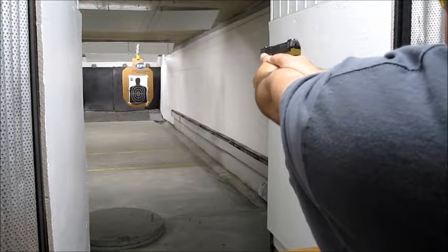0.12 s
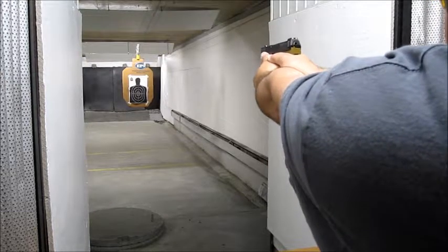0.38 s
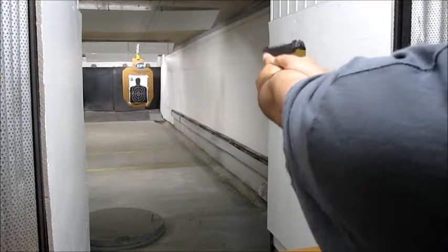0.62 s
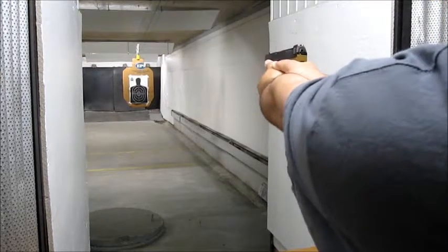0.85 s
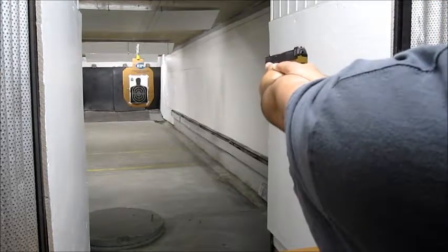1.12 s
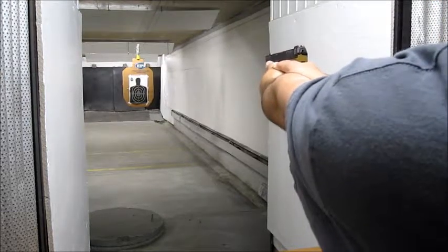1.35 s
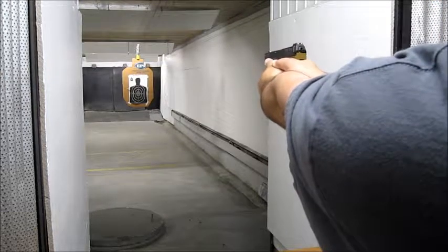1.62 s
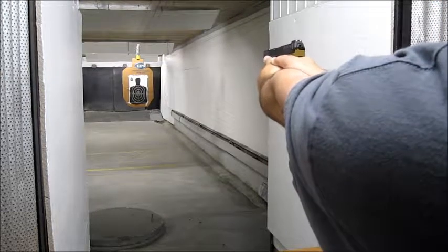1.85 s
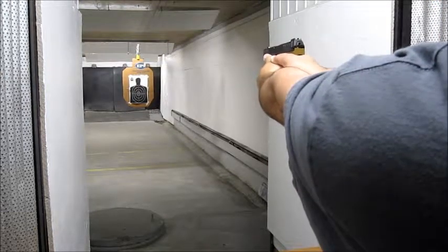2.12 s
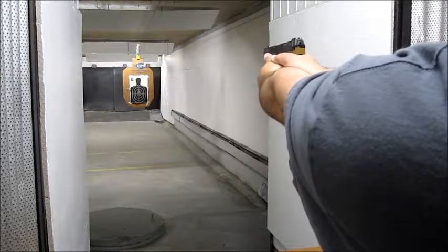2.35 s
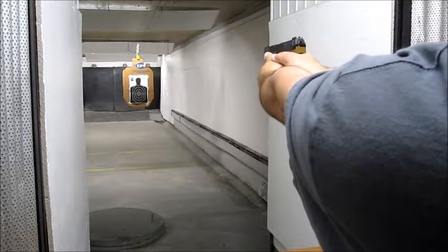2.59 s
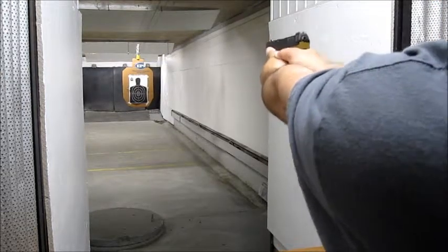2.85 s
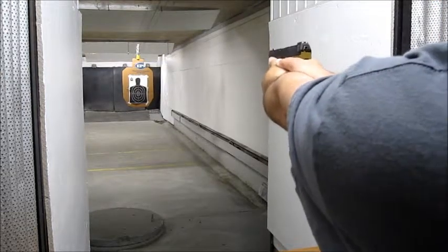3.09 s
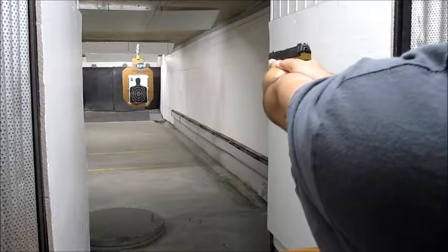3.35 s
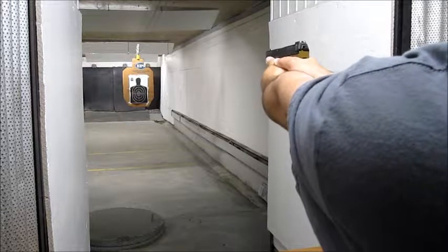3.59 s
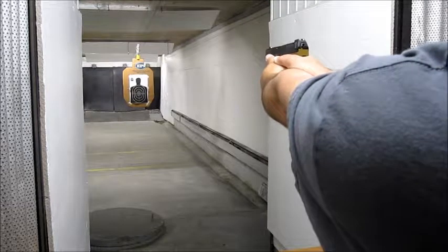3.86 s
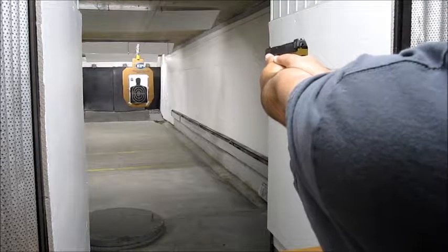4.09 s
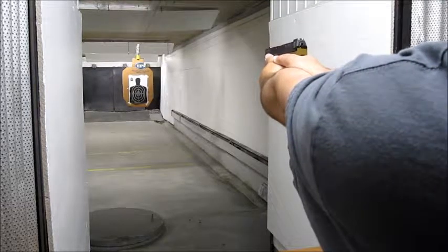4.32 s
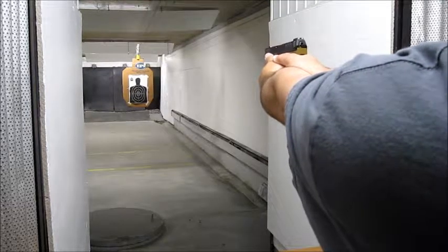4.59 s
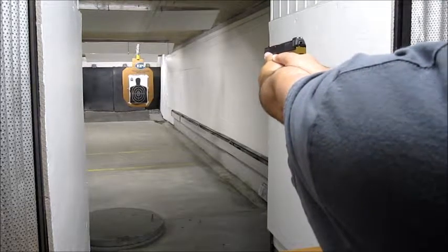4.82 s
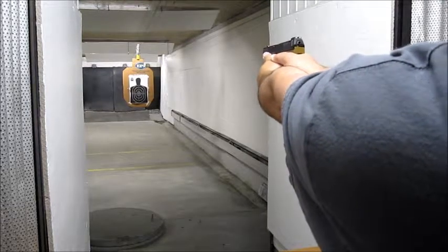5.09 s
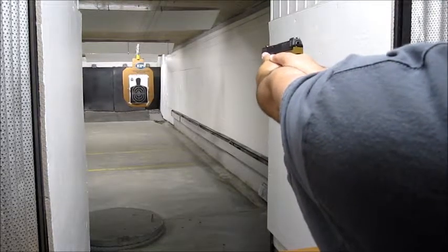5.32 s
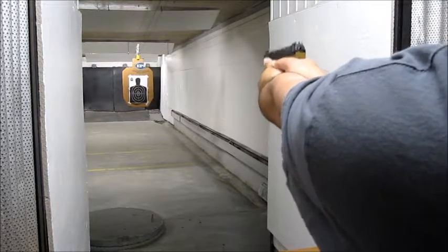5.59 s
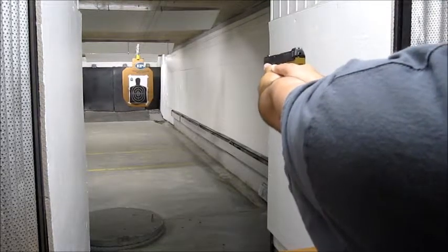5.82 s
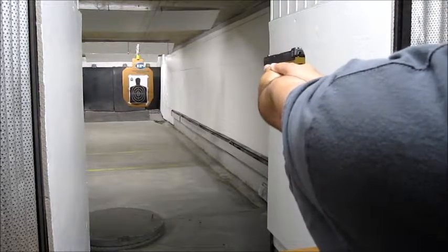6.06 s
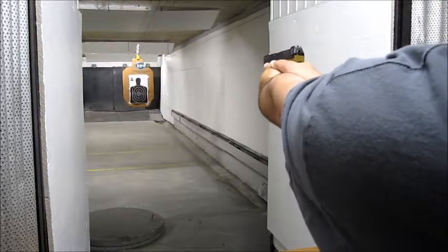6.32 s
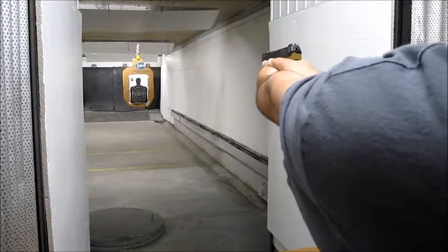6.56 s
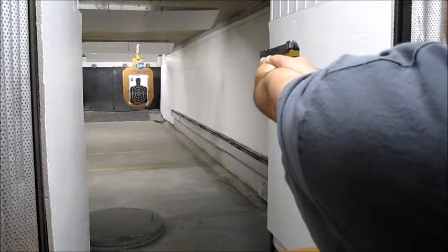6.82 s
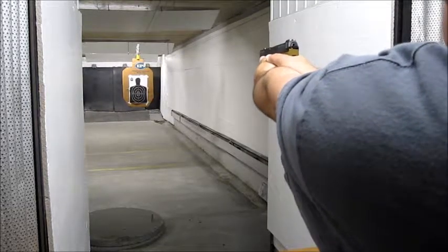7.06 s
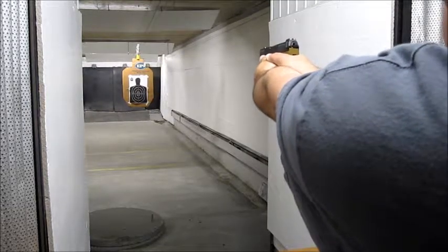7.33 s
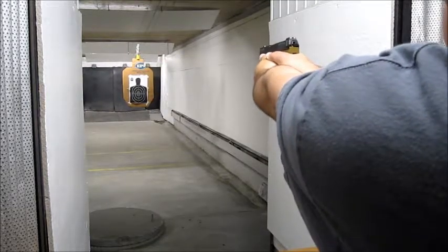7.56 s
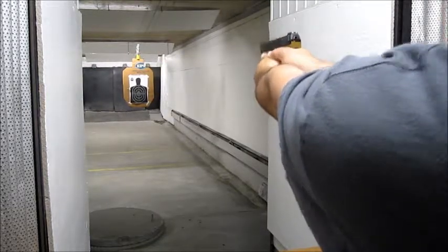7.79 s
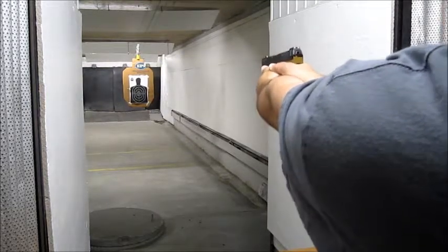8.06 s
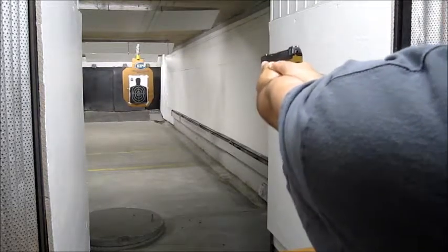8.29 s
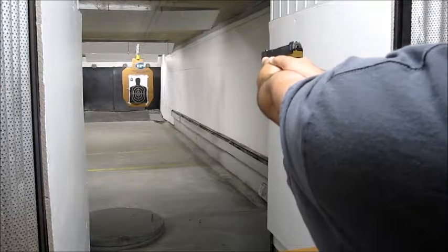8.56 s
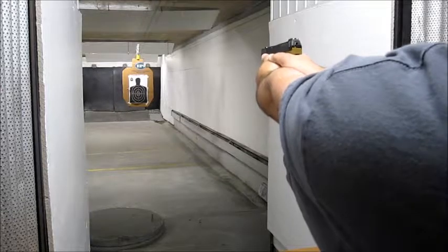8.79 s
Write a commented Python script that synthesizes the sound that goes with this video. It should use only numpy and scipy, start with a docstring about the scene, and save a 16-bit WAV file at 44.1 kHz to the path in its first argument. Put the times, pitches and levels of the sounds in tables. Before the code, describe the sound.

Four slow pistol shots overload and echo down a concrete indoor range, brass cases clinking and ringing afterward over steady ventilation hiss.

```python
"""A concrete firing lane: four slow pistol shots, heard by a small camera beside the shooter.
Each blast is banded noise that overloads the input, slaps back from the far wall and dies in the hall
while gain control holds it level. Steel fittings ring on as decaying partials. The spent brass case
ticks in noise bursts, sings as a beating tone and rattles something hollow.
Soft swishes of treble come and go; ventilation, shaped noise with faint fan tones, hisses throughout."""
import sys
import numpy as np
from scipy import signal
from scipy.fft import rfft, irfft, next_fast_len
from scipy.io import wavfile

SR = 44100
rng = np.random.default_rng(int(sys.argv[2]) if len(sys.argv) > 2 else 0)


def decibels_to_gain(level_db):
    """Convert a level in decibels to a linear amplitude gain (20 dB per decade)."""
    exponent = np.asarray(level_db, float) / 20
    return 10 ** exponent


def int16_out(signal):
    """Quantize to a 16-bit WAV file."""
    q = np.round(np.clip(np.atleast_2d(signal).T, -1, 1) * 32767)
    wavfile.write(sys.argv[1], SR, q.astype(np.int16))


N = 393372
TIME = np.arange(N) / SR  # s

# spectrum of the ventilation rush, shape only: (frequency [Hz], relative density [dB per Hz])
AIR_SPECTRUM = [(15, -32.5), (25, -9), (114, -7), (206, -11.5), (242, -5), (405, -8.5), (463, -9.5),
                (641, -10), (936, -8), (1040, -9.5), (1610, -14), (2280, -17), (16000, -44)]
# fan tones ahead of gain control: (frequency [Hz], rms level [dB])
FAN_TONES = [(242.2, -69.5), (452.2, -62.5)]
# shots: (time [s], blast level ahead of gain control [dB])
SHOTS = [(0.4953, 41), (2.8222, 40.5), (5.466, 41), (7.8021, 40.5)]
# a faint click of the pistol's action, then a short noise right before the blast:
# (lead [s], level [dB], centre [Hz], t60 [s])
LEAD_IN = [(0.021, -41, 6000, 0.07), (0.0035, -26, 3500, .03)]
# hall after a shot, band by band: (frequency [Hz], relative density [dB per Hz], t60 [s], build-up [s])
HALL_BANDS = [(40, -44, 1.1, .004), (125, -30.5, 0.76, .006), (205, -19, 0.81, .012),
              (420, -4.5, 0.91, 0.03), (616, -5, 0.97, 0.025), (932, 1.5, 0.98, 0.033),
              (1250, -1, 1.033, 0.023), (1655, -2, 1, 0.039), (3570, -10, 0.94, 0.0094),
              (5710, -15, 0.87, 0.0073), (7530, -15.5, 0.68, 0.0089), (11000, -21, 0.54, 0.0049),
              (14000, -25.5, .48, 0.0055), (17000, -38, .45, 0.0055)]
# partials of the steel fittings: (frequency [Hz], relative level [dB], t60 [s])
STEEL_MODES = [(432, 1.5, 1.67), (455, -18.5, 4.26), (699, 4, 1.76), (695, -5.5, 1.3), (860, -3.5, 1.8),
               (913, -1, 2.02), (1001, 2.5, 1.5), (1052, 0.5, 2.04), (1526, -0.5, 1.8)]
# the case strikes something hollow:
# (time [s], level [dB], strongest near [Hz], share of the free ringing time [ratio])
KNOCKS = [(1.3186, -21.5, 3200, 0.17), (1.8990, -32, 2580, 1), (6.2457, -19, 3050, .14),
          (6.6267, -25.5, 1240, 0.37), (6.682, -34.5, 1250, 0.18), (6.704, -34.5, 1190, 0.19)]
# partials of the hollow thing, ringing freely: (frequency [Hz], relative level [dB], t60 [s])
HOLLOW_MODES = [(1070, 2.5, 0.15), (1301, 6, 0.19), (1576, -1, 0.32), (1900, -26, 0.12), (2135, -21, .1),
                (2293, 0, 0.33), (2400, -2, 0.12), (2540, 9, 0.18), (2920, 13, 0.12), (3100, -12, 0.18),
                (3470, 4.5, 0.19), (3680, 5, 0.13), (4040, 1, 0.17), (4156, -9, 0.14), (4630, -7, 0.173)]
# case bounces that stand out: (time [s], tick level [dB], tick centre [Hz], wall ring level [dB])
BOUNCES = [(1.3196, -20.5, 6200, -58), (1.4121, -7.5, 6400, -32), (1.7469, -29.5, 4630, -41),
           (1.8990, -40, 7000, -39), (1.9654, -40.5, 7500, -41), (1.9960, -35, 7500, -26.5),
           (2.0304, -57, 6000, -35), (2.0990, -30.5, 7270, -28), (2.3484, -63, 6000, -60),
           (2.6744, -66, 6000, -67), (3.6422, -18, 5430, -34), (3.7888, -50, 8000, -69),
           (3.973, -31, 4660, -45.5), (4.104, -31.5, 4530, -36), (4.2460, -37, 6000, -32),
           (4.2994, -50, 4600, -55), (4.4974, -60.5, 6000, -52), (4.6694, -62, 6000, -49),
           (4.7444, -63.5, 6000, -52), (6.2468, -18, 6400, -58), (6.4495, -12, 3070, -34),
           (6.6292, -23, 6200, -52), (6.683, -30, 3000, -65), (6.7320, -31, 2980, -64),
           (6.8496, -40, 3300, -73), (6.915, -40, 3270, -71), (7.0500, -44, 3000, -66),
           (7.2091, -46.5, 3300, -70), (8.5947, -20, 5540, -24.5)]
# wall ring of the case from each shot in turn: (frequency [Hz], t60 [s])
CASES = [(10630, 0.27), (10790, 0.35), (11310, 0.41), (11390, 0.41)]
# soft swishes: (centre time [s], level [dB], width [s], centre frequency [Hz])
SWISHES = [(2.55, -61, 0.053, 6000), (4.48, -60, 0.027, 7000), (4.596, -51, 0.0348, 5700),
           (5.23, -60, 0.0083, 8500)]


def fade(t, t60):
    """Amplitude of an exponential decay that starts at t = 0 and loses 60 dB in t60 seconds."""
    return np.where(t >= 0, np.exp(-np.log(1000) * np.maximum(t, 0) / t60), 0)


def band(x, hz, octaves):
    """Band-pass around hz."""
    edges = np.clip(hz * 2. ** (np.array([-.5, .5]) * octaves), 10, .45 * SR)
    return signal.sosfilt(signal.butter(2, edges, "band", fs=SR, output="sos"), x)


def unit(x):
    """Scale to rms 1."""
    return x / np.sqrt(np.mean(x ** 2))


def noise_band(length, hz, octaves):
    """White noise band-passed around hz, at rms 1."""
    return unit(band(rng.standard_normal(length), hz, octaves))


def ring(t, modes):
    """Sum of decaying partials (frequency [Hz], level [dB], t60 [s]) with chance phases."""
    out = np.zeros(len(t))
    for hz, db, t60 in modes:
        phase = rng.uniform(0, 2 * np.pi)
        out += decibels_to_gain(db) * fade(t, t60) * np.sin(2 * np.pi * hz * t + phase)
    return out


def add(out, s, x):
    """Mix x into out from time s."""
    i = int(s * SR)
    out[i:i + len(x)] += x[:len(out) - i]


def ventilation():
    """Air rushes smoothly and broadly: noise shaped in frequency, with faint steady fan tones."""
    rush_db = -46.5  # rms
    hz, db = np.transpose(AIR_SPECTRUM)
    size = next_fast_len(N)
    f = np.maximum(np.fft.rfftfreq(size, 1 / SR), 1)
    shape = decibels_to_gain(np.interp(np.log(f), np.log(hz), db))
    rush = irfft(rfft(rng.standard_normal(size)) * shape, size)[:N]
    out = decibels_to_gain(rush_db) * unit(rush)
    for tone_hz, tone_db in FAN_TONES:
        out += np.sqrt(2) * decibels_to_gain(tone_db) * np.sin(2 * np.pi * tone_hz * TIME)
    return out


def lead_in(out, shot_s):
    """A faint click of the pistol's action, then a short noise close to the blast: decaying noise bands."""
    t = TIME[:3000]
    for lead, db, hz, t60 in LEAD_IN:
        add(out, shot_s - lead, decibels_to_gain(db) * fade(t, t60) * noise_band(len(t), hz, 2.0))


def blast(t, count):
    """Dense reflections as banded noise: near walls, then slaps and tail from the far end."""
    near_db, near_t60 = 9.0, .36  # booth and near walls: dB over the tail, s
    trip, far_db, far_t60 = .0865, 5.0, .32  # far wall: round trip s, dB over the tail, s
    loss_db = -11.0  # change with each further trip
    power = (decibels_to_gain(near_db) * fade(t, near_t60)) ** 2
    power = power + (t >= trip)  # the tail joins after one round trip
    for k in range(3):
        slap = decibels_to_gain(far_db + k * loss_db) * fade(t - (k + 1) * trip, far_t60)
        power = power + slap ** 2

    hz, db, t60, build = np.transpose(HALL_BANDS)
    spectra = rfft(rng.standard_normal((count, len(t))))
    log_f = np.log(np.fft.rfftfreq(len(t), 1 / SR) + 1)
    place = np.interp(log_f, np.log(hz), np.arange(len(hz)))
    out = 0
    for k in range(len(hz)):
        share = np.clip(1 - np.abs(place - k), 0, 1)  # overlapping bands that add up to one
        noise = irfft(spectra * share, len(t))
        swell = 1 - np.exp(-t / build[k]) * 1.08  # 1.08 opens with a faint inverted onset
        out = out + decibels_to_gain(db[k]) * fade(t, t60[k]) * swell * noise
    return out * np.sqrt(power)


def steel():
    """Steel fittings swell and ring on: a sum of decaying partials."""
    level_db, swell = -11, .05  # dB, s
    t = TIME[:3 * SR]
    return decibels_to_gain(level_db) * ring(t, STEEL_MODES) * (1 - np.exp(-t / swell))


def shots():
    """One hall answers every shot, its reflections partly stirred by aim and moving air."""
    fresh = 0.58  # share of the blast's power that differs from shot to shot
    out = np.zeros(N)
    hall, *stirred = blast(TIME[:2 * SR], count=len(SHOTS) + 1)
    fittings = steel()
    for (s, db), other in zip(SHOTS, stirred):
        lead_in(out, s)
        add(out, s, decibels_to_gain(db) * (np.sqrt(1 - fresh) * hall + np.sqrt(fresh) * other))
        add(out, s, fittings)
    return out


def knocks():
    """The case rattles against something hollow: a rough clack, and taps that excite damped modes."""
    swell, t60 = .01, .24  # s, both scaled by each knock's share
    off_db = 11  # lost per octave from the strongest mode
    clack_db, clack_octaves = 7.5, 1.4  # dB over the knock, octaves
    out, t = np.zeros(N), TIME[:SR // 2]
    for s, db, hz, share in KNOCKS:
        shape = (1 - 0.58 * np.exp(-t / (swell * share))) * fade(t, t60 * share)
        taps = rng.standard_normal(len(t)) ** 3 * shape  # cubing leaves sparse peaks
        damped = []
        for mode_hz, mode_db, mode_t60 in HOLLOW_MODES:
            loss_db = off_db * abs(np.log2(mode_hz / hz))
            damped.append((mode_hz, db + mode_db - loss_db, mode_t60 * share))
        add(out, s, signal.fftconvolve(ring(t, damped), taps / np.linalg.norm(taps)))
        clack = unit(band(rng.laplace(size=len(t)), hz, clack_octaves))
        add(out, s, decibels_to_gain(db + clack_db) * shape * clack)
    return out


def bounce_noise(t, db, hz):
    """A bounce ticks in a noise band, wider and brighter when harder; a short body and booth tail follow."""
    tick_t60 = .035  # s
    breadth, wider = 2.2, .04  # octaves at -30 dB, octaves more per dB
    tail_db, tail_t60, tail_centre = -15.5, 0.44, 0.72  # booth: dB, s, share of tick centre
    edge_hz, edge_octaves, edge_tail_t60 = 9500, 1.2, .17  # bright edge: Hz, octaves, s
    edge_db, harder = -14, .15  # dB over a -20 dB tick, dB more per dB of tick
    body_octaves, body_t60, body_db = .26, .12, 1  # octaves, s, dB over the tick
    body_best_hz, body_off_db = 4750, 30  # strongest at Hz, dB lost per octave away

    octaves = max(breadth + wider * (db + 30), 1)
    tick = noise_band(len(t), hz, octaves) * fade(t, tick_t60)
    tail = decibels_to_gain(tail_db) * noise_band(len(t), tail_centre * hz, breadth) * fade(t, tail_t60)
    edge_shape = fade(t, tick_t60) + decibels_to_gain(tail_db) * fade(t, edge_tail_t60)
    edge_gain = decibels_to_gain(edge_db + harder * (db + 20))
    edge = edge_gain * noise_band(len(t), edge_hz, edge_octaves) * edge_shape
    body_gain = decibels_to_gain(body_db - body_off_db * abs(np.log2(hz / body_best_hz)))
    body = body_gain * noise_band(len(t), hz, body_octaves) * fade(t, body_t60)
    return decibels_to_gain(db) * (tick + tail + edge + body)


def singing_wall(t, hz, t60, db):
    """The spinning case wall sings: its spin splits the tone with a beat that slows after the bounce."""
    fast, slow, slowing = 76.5, 15.7, .0275  # half split at the bounce Hz, later Hz, slowing s
    scatter = .3  # spread of the natural log of spin rate, bounce to bounce
    swell, steady = .004, 1.55  # s, steady part against a spin beat of 1
    phase, spin, spin_phase = rng.standard_normal(3)
    turns = 2 * np.pi * (slow * t + (fast - slow) * slowing * (1 - np.exp(-t / slowing)))
    beat = steady + np.cos(turns * np.exp(scatter * spin) + spin_phase)
    tone = np.sin(2 * np.pi * hz * t + np.pi * phase)
    return decibels_to_gain(db) * (1 - np.exp(-t / swell)) * fade(t, t60) * tone * beat


def brass():
    """Each bounce makes its tick and sets the wall of the latest shot's case singing."""
    contact = .0007  # s
    out, t = np.zeros(N), TIME[:SR // 2]
    shot_times = [row[0] for row in SHOTS]
    for s, db, hz, ring_db in BOUNCES:
        wall_hz, wall_t60 = CASES[np.searchsorted(shot_times, s) - 1]
        sound = bounce_noise(t, db, hz) + singing_wall(t, wall_hz, wall_t60, ring_db)
        add(out, s, (1 - np.exp(-t / contact)) * sound)
    return out


def swishes():
    """Treble hiss rises and falls softly and briefly: noise bands under a bell-shaped envelope."""
    out, t = np.zeros(N), TIME[:SR // 4] - 1 / 8
    for s, db, width, hz in SWISHES:
        bell = np.exp(-.5 * (t / width) ** 2)
        add(out, s - 1 / 8, decibels_to_gain(db) * bell * noise_band(len(t), hz, 1.8))
    return out


def scene():
    """Everything that reaches the single microphone."""
    return (ventilation() + shots() + knocks() + brass() + swishes())[None]


def follow(x, attack, release):
    """Level detector in short blocks that rises fast and falls slowly."""
    block = 32  # samples
    levels = np.abs(x[:len(x) // block * block]).reshape(-1, block).mean(axis=1)
    envelope = 0.
    for i, level in enumerate(levels):
        seconds = attack if level > envelope else release
        envelope += (level - envelope) * min(block / SR / seconds, 1)
        levels[i] = envelope
    return np.interp(np.arange(len(x)), block * np.arange(1, len(levels) + 1), levels)


def gain_control(dry):
    """Holds loud sound at one level, down to the deepest cut, with gain smoothed on a log scale."""
    hold_db, cut_db, ceiling_db = -19.5, -37, 39  # held level, deepest cut, detector ceiling
    attack, release, smooth = .0015, .045, .002  # s
    level = follow(np.minimum(np.abs(dry[0]), decibels_to_gain(ceiling_db)), attack, release)
    gain = np.clip(decibels_to_gain(hold_db) / (level + 1e-9), decibels_to_gain(cut_db), 1)
    pole = np.exp(-1 / (smooth * SR))
    return dry * np.exp(signal.lfilter([1 - pole], [1, -pole], np.log(gain)))


def top_cut(x):
    """Nothing passes above the cut-off."""
    return signal.sosfilt(signal.butter(12, 17000, fs=SR, output="sos"), x)


def record(dry):
    """Gain control, then an overloaded input: hard limit, soft clip and steep treble cuts."""
    clip, top_hz = .52, 15900  # full-scale share, Hz
    limited = np.clip(gain_control(dry), -2 * clip, 2 * clip)
    drive = signal.sosfilt(signal.butter(12, top_hz, fs=SR, output="sos"), limited) / clip
    clipped = clip * drive / (1 + drive ** 4) ** .25
    mix = signal.sosfiltfilt(signal.butter(12, top_hz + 200, fs=SR, output="sos"), clipped)
    return top_cut(mix)


dry = scene()
out = record(dry)
int16_out(out)
```